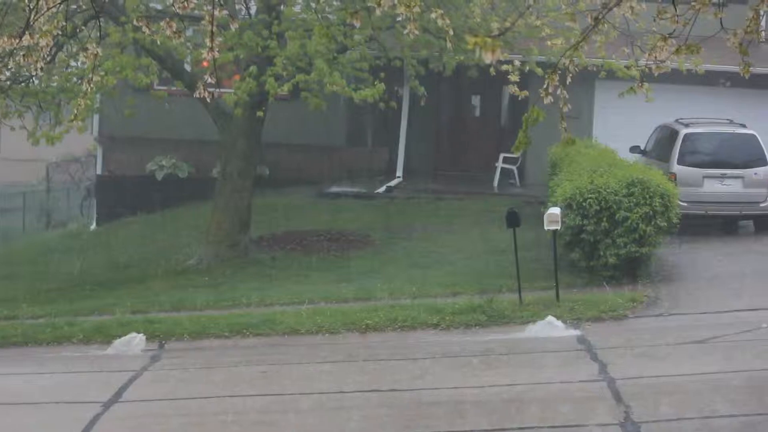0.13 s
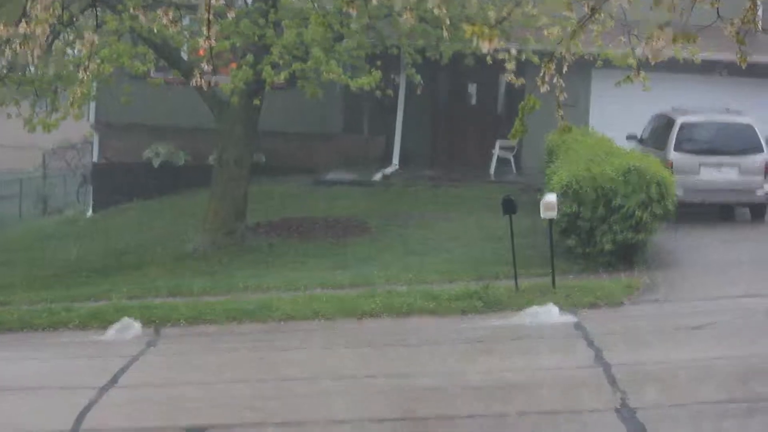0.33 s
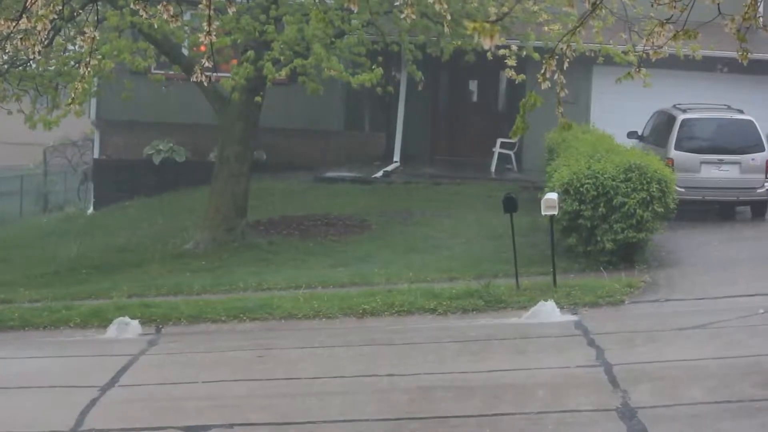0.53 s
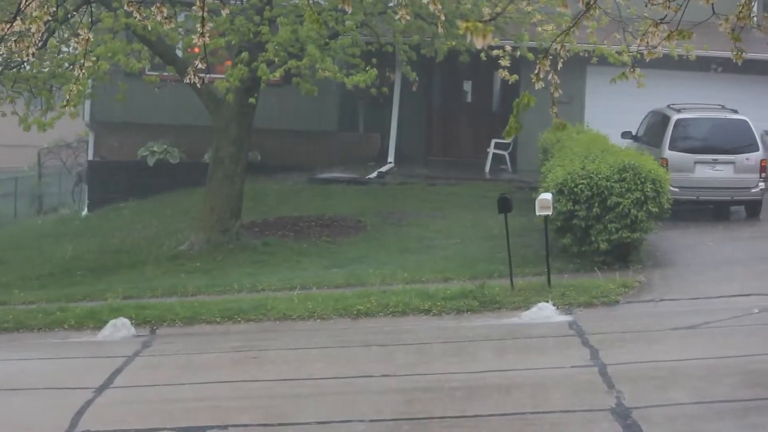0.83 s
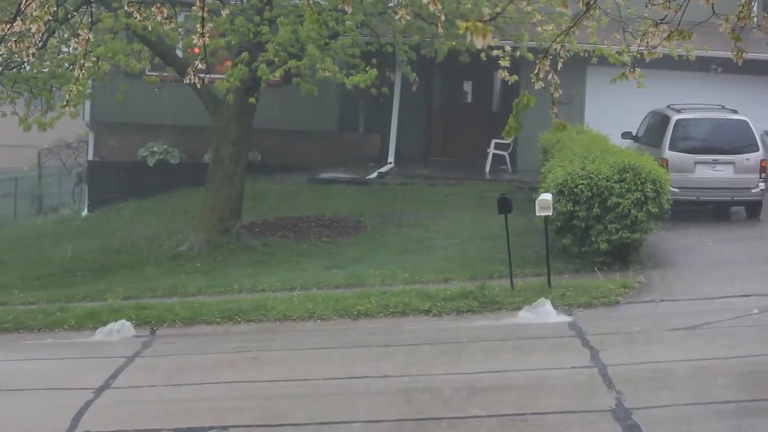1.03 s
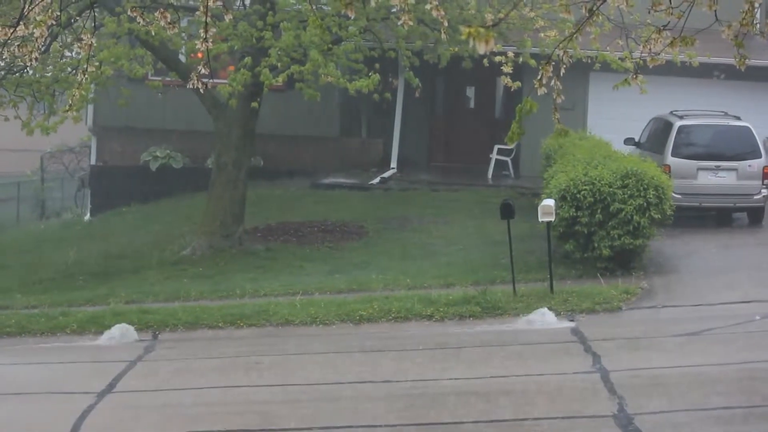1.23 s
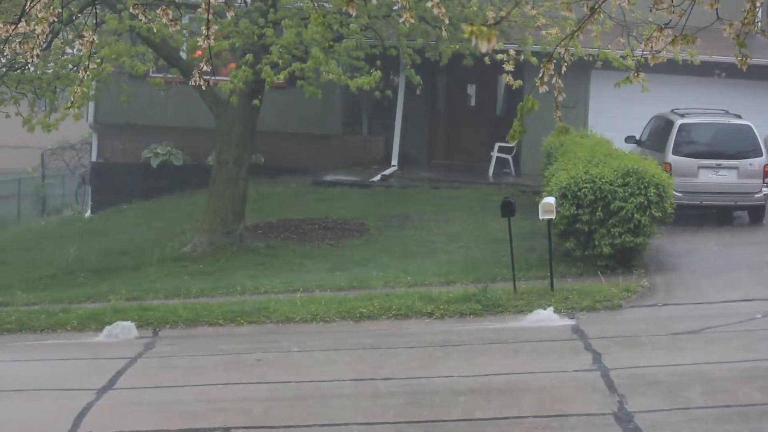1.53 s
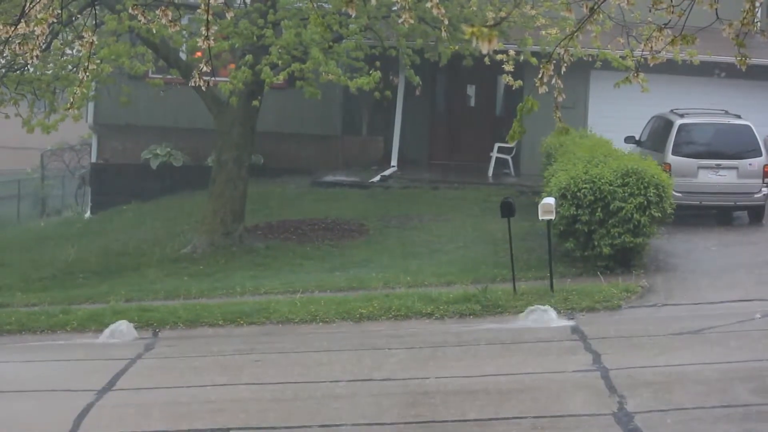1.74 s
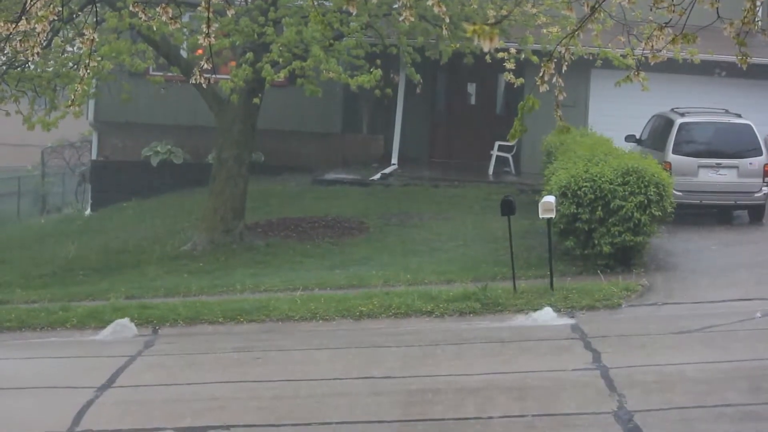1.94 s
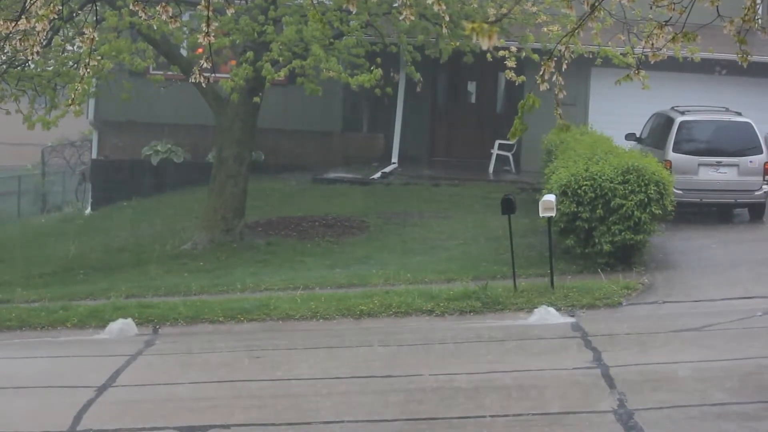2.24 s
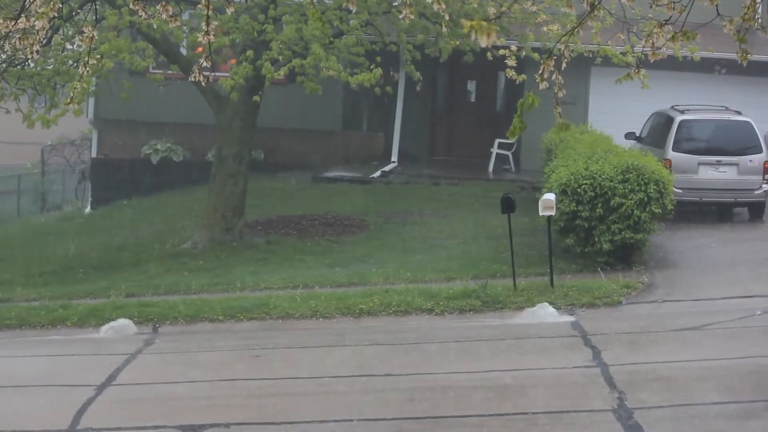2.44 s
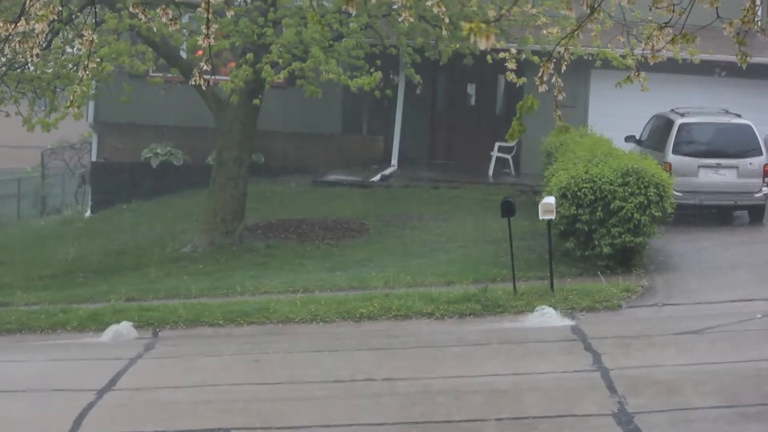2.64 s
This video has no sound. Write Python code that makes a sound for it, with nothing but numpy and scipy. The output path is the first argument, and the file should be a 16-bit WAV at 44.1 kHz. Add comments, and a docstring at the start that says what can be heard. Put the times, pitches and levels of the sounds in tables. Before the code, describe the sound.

A constant downpour in a residential street, heard in mono: broad rushing wash, fine crackling patter at middle distance, and irregular loud clicks of close drops, easing slightly towards the end.

```python
"""A residential street in heavy rain, heard in mono.
Countless far drops merge into a wash of filtered noise over a low rumble, with drumming from noise in
narrow resonances. Nearer drops patter as random ticks; a few land close by, each a short tick with
a fading spray of noise. The recorder's gain ducks after the loudest ticks."""
import sys
import numpy as np
from scipy import signal
from scipy.fft import rfft, irfft
from scipy.io import wavfile
from scipy.ndimage import uniform_filter1d

SR = 44100
rng = np.random.default_rng(int(sys.argv[2]) if len(sys.argv) > 2 else 0)


def put_to_file(sound):
    """Save the sound as 16-bit audio at rate SR, in the file named by the first command-line argument."""
    columns = np.atleast_2d(sound).T  # one column per channel
    safe = np.clip(columns, -1, 1)
    whole_steps = np.round(safe * 32767)
    wavfile.write(sys.argv[1], SR, whole_steps.astype(np.int16))


N = 123039  # length in samples


def amp(db):
    """Turns decibels into gain."""
    return 10 ** (np.asarray(db) / 20)


def unit(x):
    """Scales a sound to an rms of 1."""
    return x / np.sqrt(np.mean(x ** 2) + 1e-20)


def add(mix, s, sound):
    """Mixes a sound in at s seconds, cutting it off at the end of the mix."""
    part = mix[max(round(s * SR), 0):][:len(sound)]
    part += sound[:len(part)]


# Overall level of the rain sound: (time [s], level [dB])
RAIN_LEVEL = [(.12, -1.5), (.33, -1.1), (.56, -1), (.64, 1), (.76, -1.2), (.86, 0.5), (1.1, -0.1),
              (1.38, -0.4), (1.52, -1.5), (1.6, -1), (1.86, -1), (1.97, -2), (2.06, -4), (2.14, -2),
              (2.21, -3), (2.31, -5), (2.54, -5), (2.62, -4), (2.79, -3)]


def rain_db(t):
    """Level of the rain sound at times t; shared by wash, drumming and patter."""
    return np.interp(t, *np.transpose(RAIN_LEVEL))


# Low rumble and drumming against the rest: (time [s], level [dB])
LOW_END_LEVEL = [(.12, 1), (.26, 3.5), (.39, -0.5), (.47, 4.5), (.63, 4.5), (.75, -1.5), (.86, 1.5),
                 (.95, -1.5), (1.1, 0.5), (1.4, 1.5), (1.62, -1), (1.75, -3), (2.05, -0.5), (2.2, 0.5),
                 (2.5, 0.5), (2.79, -1)]


def bass_db(t):
    """Level of the low end at times t."""
    return np.interp(t, *np.transpose(LOW_END_LEVEL))


# Tone colour of far rain on road, lawn and trees: (frequency [Hz], relative spectral level [dB])
WASH_COLOUR = [(22, -46), (36, -25), (60, -8), (100, -9.5), (240, -3), (420, -3), (520, -2), (850, -1),
               (1500, -3.1), (1900, 0), (2400, -1), (5200, -1.5), (7400, -6.5), (10000, -10), (12600, -9),
               (15600, -9.5)]
WASH_DB, PATCH_DB = -19, 0.91  # rms of the wash, rms swing of its patches
TREBLE_FOLLOW, BASS_FOLLOW = 0.89, 1.33  # dB each end of the wash moves per dB of rain level
BASS_HZ = 259  # the low-end level acts mostly below this


def wash():
    """Far drops merge into a hiss with patches drifting in time and pitch, over a low rumble."""
    hop, window = 256, 1024  # samples
    hz = np.fft.rfftfreq(window, 1 / SR)
    frames = N // hop + 5
    t = np.arange(frames) * hop / SR
    real, imaginary, patches = rng.standard_normal((3, frames, len(hz)))
    patches = uniform_filter1d(patches, size=8, axis=0)  # smooth over time
    patches = unit(uniform_filter1d(patches, size=18, axis=1))  # then over frequency

    follow = BASS_FOLLOW + (TREBLE_FOLLOW - BASS_FOLLOW) * hz / (hz + 2000)
    level_db = rain_db(t)[:, None] * follow
    level_db += bass_db(t)[:, None] / (1 + (hz / BASS_HZ) ** 2)
    level_db += PATCH_DB * patches
    spectrum = (real + 1j * imaginary) * amp(level_db)
    hiss = signal.istft(spectrum.T, nperseg=window, noverlap=window - hop)[1][:N]

    colour_hz, colour_db = np.transpose(WASH_COLOUR)
    log_hz = np.log(np.fft.rfftfreq(N, 1 / SR) + 1)
    colour = amp(np.interp(log_hz, np.log(colour_hz), colour_db))
    return amp(WASH_DB) * unit(irfft(rfft(hiss) * colour, N))


# Hollow drumming of rain on roofs, before the rain and low-end levels:
# (frequency [Hz], width at half amplitude [Hz], rms level [dB])
ROOF_RESONANCES = [(133, 19, -44), (197.3, 41, -40.5), (492.6, 9.9, -46.5)]
DRUM_FOLLOW = 1.64  # dB per dB of rain level


def drumming():
    """Dense blows, as steady noise, keep a few low resonances sounding."""
    f = np.fft.rfftfreq(N, 1 / SR)
    t = np.arange(N) / SR
    out = np.zeros(N)
    for hz, width, db in ROOF_RESONANCES:
        resonance = 1 / (1 + ((f - hz) / (width / 2)) ** 2)
        blows = rng.standard_normal(N)
        out += amp(db) * unit(irfft(rfft(blows) * resonance, N))
    return out * amp(DRUM_FOLLOW * rain_db(t) + bass_db(t))


TICK_CYCLES, TICK_RISE_CYCLES = 1.0, 0.54  # decay and rise of a tick
TICK_LEAD = 64  # samples before the crest of its envelope


def tick(hz, phase):
    """One impact: a wave of two or three cycles that swells fast and dies away a little slower."""
    cycles = (np.arange(256) - TICK_LEAD) / SR * hz
    rise = (np.minimum(cycles, 0) / TICK_RISE_CYCLES) ** 2
    decay = (np.maximum(cycles, 0) / TICK_CYCLES) ** 1.5
    return np.exp(-rise - decay) * np.cos(2 * np.pi * (cycles + phase))


# Drops at middle distance:
# (lowest pitch [Hz], highest pitch [Hz], rate [drops/s], rms level [dB], spread of sizes [dB])
PATTER_BANDS = [(1210, 3850, 1100, -30, 2.5), (3760, 9700, 1500, -30, 3.5), (7860, 12700, 1100, -30.5, 3)]
LARGEST = 4  # largest patter drop, in spreads


def patter_band(low_hz, high_hz, per_s, db, spread_db, count=20):
    """Random ticks at count pitches, mostly small, following the rain level."""
    out = np.zeros(N)
    for hz in np.geomspace(low_hz, high_hz, count):
        sizes = amp(spread_db * np.minimum(rng.exponential(1, N), LARGEST))
        landings = rng.random(N) < per_s / count / SR
        out += signal.oaconvolve(sizes * landings, tick(hz, rng.random()))[:N]
    return amp(db) * unit(out * amp(rain_db(np.arange(N) / SR)))


def patter():
    """Nearer drops, low to high pitched, tick at random over one another."""
    return sum(patter_band(*band) for band in PATTER_BANDS)


# Drops landing close by:
# (time [s], pitch [Hz], tick level [dB], starting spray level against the tick [dB])
NEAR_DROPS = [(.1757, 14500, -9, -8), (.182, 4500, -8.5, -7.5), (.2304, 5600, -6.5, -12),
              (.2924, 5630, -5.5, -12), (.4904, 13000, -4, -15), (0.4985, 11300, -2.5, -18),
              (.5978, 9500, -6, -15), (.6593, 7000, -4.5, -17), (.686, 6400, -9, -10),
              (0.7156, 12800, -1, -16), (0.719, 6700, -10, -6), (0.7248, 11500, -3.5, -12.5),
              (1.0063, 4800, -4, -16), (1.076, 3800, -2, -18), (1.2, 12000, -15, -6),
              (1.2097, 3400, -8.5, -9), (1.2744, 12500, -1.5, -19), (1.3584, 3600, -6, -23),
              (1.4842, 7500, -8, -29), (1.577, 5000, -11, -9), (1.585, 1900, -14, -3.5),
              (1.6056, 9000, -10, -20), (1.611, 5500, -7.5, -10), (1.803, 4400, -1.5, -19),
              (1.8081, 10500, -7, -14), (1.8643, 5000, -8, -11), (1.8725, 12500, -6, -16),
              (1.8801, 12300, -10, -11), (1.9994, 3370, 0.5, -21), (2.007, 4600, -7, -23),
              (2.0096, 7800, -2.5, -18), (2.118, 2200, -13, -10), (2.1257, 10500, -12, -13),
              (2.2117, 3430, 0, -23), (2.222, 3800, -6.5, -13), (2.249, 4400, -4, -27),
              (2.2575, 6000, -6, -17), (2.261, 5200, 1, -22), (2.2673, 6000, -2, -17),
              (2.4034, 10500, -7, -19), (2.416, 4800, -7, -18), (2.4218, 6400, -9, -10.5),
              (2.4937, 3220, -6.5, -23), (2.626, 4200, -10, -16), (2.636, 6700, -3.5, -15.5),
              (2.7297, 12300, -5, -14), (2.7325, 4400, -5.5, -17), (2.7393, 5800, -7.5, -8.5),
              (2.7442, 5700, -10, -23)]
SPRAY_S, SPRAY_WIDTH = .007, .28  # fade time constant; octaves either side, to half amplitude


def close_drops(size=2048):
    """Each near drop ticks and throws a fading spray of droplets: uneven noise around its pitch."""
    out = np.zeros(N)
    t = np.arange(size) / SR
    f = np.fft.rfftfreq(size, 1 / SR)
    for s, hz, db, spray_db in NEAR_DROPS:
        add(out, s - TICK_LEAD / SR, amp(db) * tick(hz, rng.random()))
        droplets = rng.standard_normal(size) * rng.exponential(1, size)
        octaves = np.log2((f + 1) / hz)
        spray = unit(irfft(rfft(droplets) / (1 + (octaves / SPRAY_WIDTH) ** 2), size))
        add(out, s, amp(db + spray_db) * spray * np.exp(-t / SPRAY_S))
    return out


def scene():
    """All the rain, the same in both channels."""
    rain = wash() + drumming() + patter() + close_drops()
    return np.array([rain, rain])


START_S = 0.1208  # silence before this
LIMIT_DB, DUCK_SHARE = -2.5, .6  # ducking threshold, share of the excess taken off
RECOVER_DB_PER_S, DUCK_S = 22, .012  # fall of the held excess, smoothing time constant
CEILING, EDGE_HZ = .9, 15750  # clipping level, top of the band


def record(dry):
    """The recorder starts, ducks after peaks and recovers slowly, clips, then limits the band."""
    live = dry * (np.arange(N) >= START_S * SR)
    over_db = np.maximum(20 * np.log10(abs(live[0]) + 1e-9) - LIMIT_DB, 0)
    # hold each peak while it falls at a steady rate
    fall = np.arange(N) * RECOVER_DB_PER_S / SR
    held_db = np.maximum.accumulate(over_db + fall) - fall
    r = np.exp(-1 / (DUCK_S * SR))
    smooth_db = signal.lfilter([1 - r], [1, -r], held_db)
    ducked = np.clip(live * amp(-DUCK_SHARE * smooth_db), -CEILING, CEILING)
    lowpass = signal.firwin(601, EDGE_HZ, window=("kaiser", 9), fs=SR)
    return signal.oaconvolve(ducked, lowpass[None], "same")


dry = scene()
out = record(dry)
put_to_file(out)
```